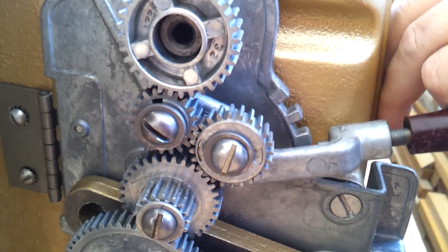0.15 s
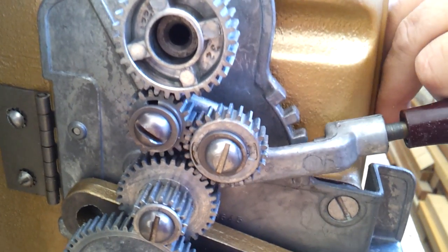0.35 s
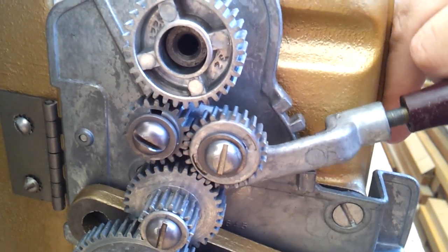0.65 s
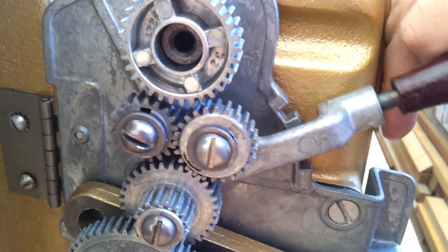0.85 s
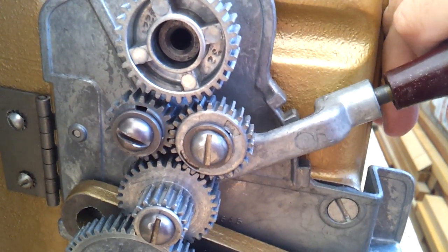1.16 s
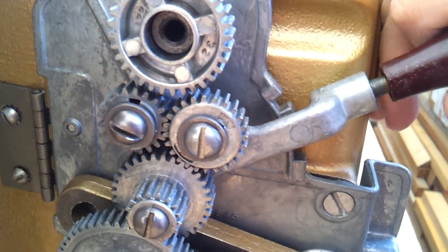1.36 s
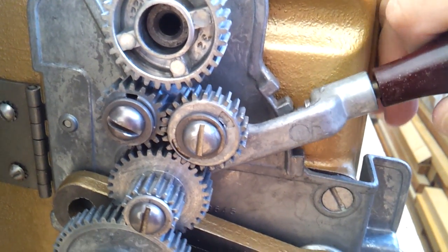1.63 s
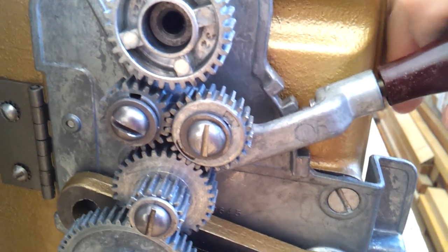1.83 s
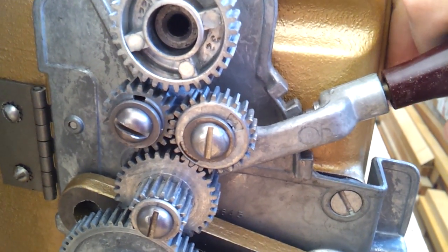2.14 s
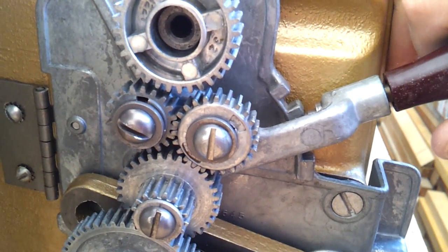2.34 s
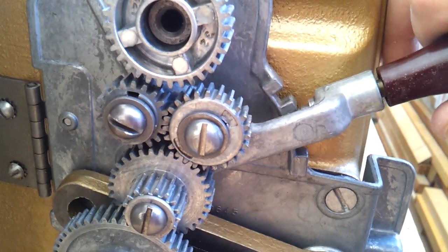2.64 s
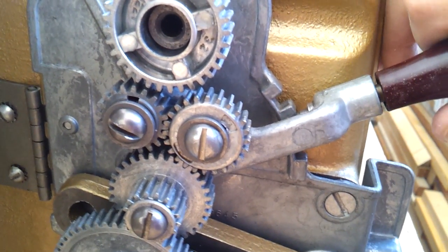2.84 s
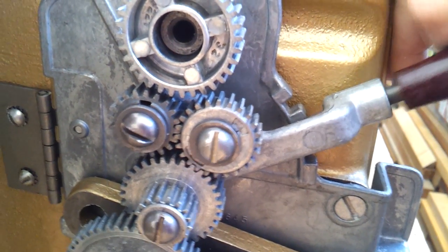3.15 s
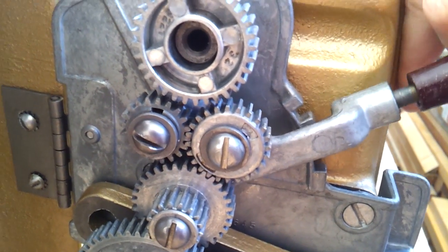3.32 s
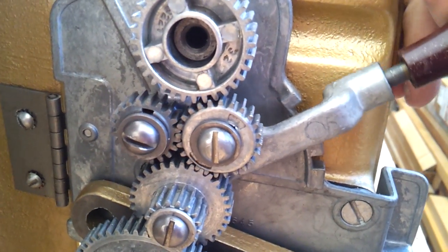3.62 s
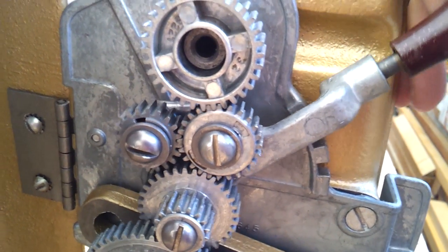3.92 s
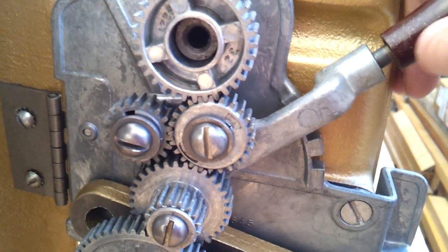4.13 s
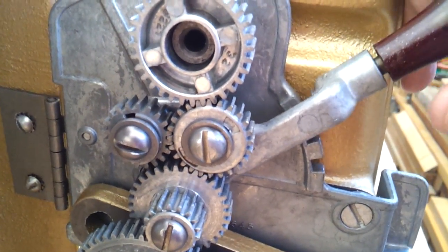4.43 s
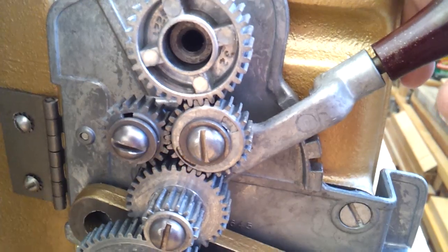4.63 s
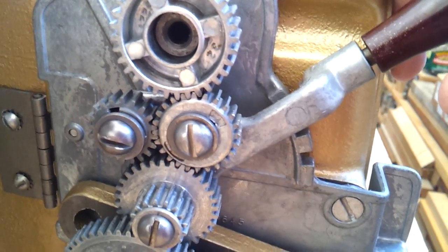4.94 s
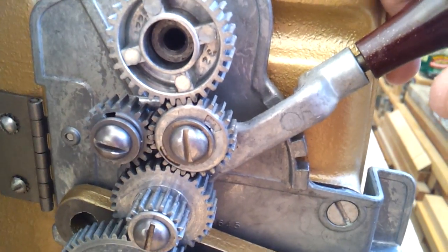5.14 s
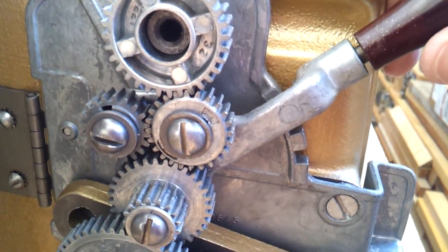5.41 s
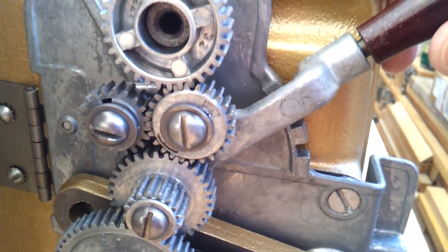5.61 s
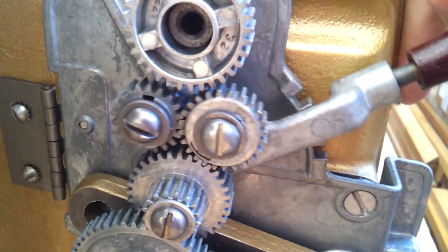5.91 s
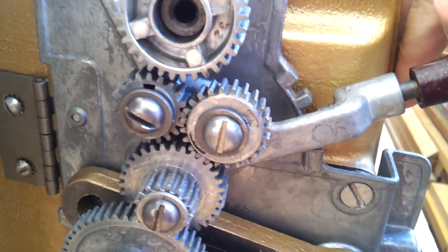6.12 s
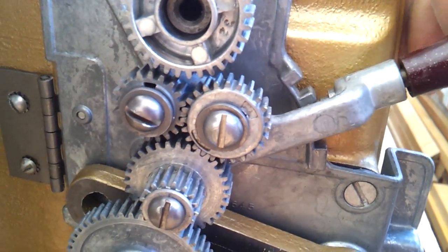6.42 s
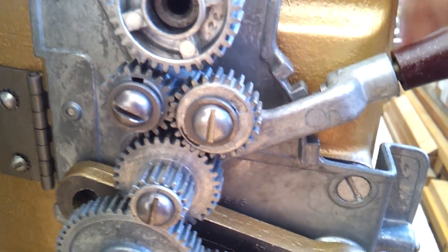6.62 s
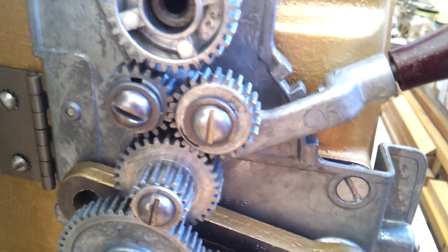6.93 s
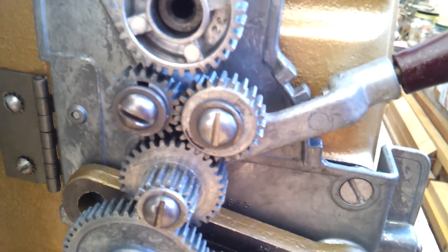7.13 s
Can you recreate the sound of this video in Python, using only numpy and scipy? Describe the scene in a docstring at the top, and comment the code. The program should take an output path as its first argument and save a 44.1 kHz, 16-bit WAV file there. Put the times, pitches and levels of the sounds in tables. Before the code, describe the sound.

Sharp metallic clacks as a geared lever is shifted by hand, hard snaps separated by quiet hiss, each ringing briefly with a soft bench thud.

```python
"""A tumbler lever on a small lathe is shifted by hand: its plunger snaps into notches and gear teeth knock.
Each blow is a brief chatter of contacts that rings frame, lever, notch plate, gears and casting.
A loosely held handle pings on, the bench thuds under soft pushes, and the quiet shop answers diffusely.
Beneath lie a smooth hiss and a faint high whine; a limiter ducks the mix after the hardest snaps."""
import sys
import numpy as np
from scipy import signal
from scipy.fft import rfft, irfft
from scipy.io import wavfile
from scipy.ndimage import uniform_filter1d, minimum_filter1d

SR = 44100
rng = np.random.default_rng(int(sys.argv[2]) if len(sys.argv) > 2 else 0)


def master(y):
    """Save y as 16-bit WAV."""
    cut = np.clip(np.atleast_2d(y).T, -1, 1)
    pcm = np.round(cut * 32767)  # scale
    wavfile.write(sys.argv[1], SR, pcm.astype(np.int16))


def ratio(d):
    """dB to gain"""
    e = np.asarray(d, float) / 20
    return 10 ** e


N = 320210  # length of the scene in samples
TAIL = 30000  # length of each ring or echo in samples


def ring(modes, scatter_db, force, detune=0.0057):
    """A struck part is a sum of decaying modes, neighbours in opposite sign, each a little off in level and pitch."""
    hz, db, t60 = np.transpose(modes)[:, :, None]
    luck = rng.standard_normal((2, len(modes), 1))
    sign = (-1) ** np.arange(len(modes))[:, None]
    t = np.arange(TAIL) / SR
    strength = sign * ratio(db + scatter_db * luck[0])
    swing = np.sin(2 * np.pi * hz * (1 + detune * luck[1]) * t)
    impulse_response = np.sum(strength * swing * 1000 ** (-t / t60), axis=0)
    y = signal.fftconvolve(impulse_response, force)[:TAIL]
    return y / np.sqrt(np.sum(y[:500] ** 2))  # unit energy in the first 500 samples


def add(track, x, s, db):
    """Lay a sound on the track from s seconds on, its peak scaled to db."""
    i = int(s * SR)
    x = x[:N - i]
    track[i:i + len(x)] += x * ratio(db) / np.max(np.abs(x))


def colour(x, points):
    """Weight the spectrum by (frequency [Hz], gain [dB]) points, joined along log frequency."""
    hz, db = np.transpose(points)
    f = np.maximum(np.arange(len(x) // 2 + 1) * SR / len(x), 1)
    return irfft(rfft(x) * ratio(np.interp(np.log(f), np.log(hz), db)), len(x))


def chatter(ms):
    """Metal on metal makes a run of tiny uneven contacts that swells and dies on a time scale of ms."""
    t = np.arange(1024) / SR / (ms / 1000)
    luck = rng.standard_normal((2, 1024))
    swell = t ** 1.25 * np.exp(-2.5 * t ** 1.1)
    contacts = luck[0] * ratio(1.5 * luck[1]) * swell
    # partly even out the spectrum, so that the modes are driven more alike
    spectrum = rfft(contacts)
    return irfft(spectrum / np.abs(spectrum) ** 0.5) * np.sqrt(swell)


def struck_parts(force, frame_db, lever_db, gears_db):
    """One force rings four parts at once; the levels are relative to the notch plate."""
    # modes of each part: (frequency [Hz], level [dB], t60 [s])
    frame_modes = [(460, -4.5, 0.026), (610, 2.5, 0.04), (676, 7.5, 0.043), (783, -2, 0.074),
                   (939, -1.5, 0.03)]
    lever_modes = [(1301, 2.2, 0.012), (1424, 1, 0.035), (1420, 5, 0.02), (1736, 7.6, 0.013)]
    plate_modes = [(1885, 1, 0.016), (2297, 4, .014), (2556, 1.5, 0.027), (2766, 3, 0.027),
                   (2990, -4, 0.036)]
    gear_modes = [(3562, 2, 0.02), (4370, -5, .015), (4407, -2, 0.02), (5220, 3, 0.018), (5337, -2, 0.023),
                  (5670, -2, 0.011), (6184, 2.5, 0.02), (6320, 9.5, 0.0026), (7120, -15, 0.028),
                  (8510, -16.5, 0.022), (11060, -13, 0.013), (12800, -11, .016)]
    plate = ring(plate_modes, 2.2, force)
    frame = ratio(frame_db) * ring(frame_modes, 3.2, force)
    lever = ratio(lever_db) * ring(lever_modes, 4.5, force)
    gears = ratio(gears_db) * ring(gear_modes, 0.8, force)
    return plate + frame + lever + gears


def casting_ring(db, frame_db, gears_db):
    """The heavy casting rings on faintly and long, its balance following how dull the blow is."""
    # modes of the casting: (frequency [Hz], level [dB], t60 [s])
    casting_modes = [(484, 5.5, .55), (896, -4, .57), (1276, -4.5, 0.62), (1320, -8.5, 0.74),
                     (2525, -8, 0.44), (2933, -8, 0.35), (2700, -13, 0.3), (2815, -4.5, 0.4),
                     (2804, -5, .62), (2900, -4.5, 0.49), (2805, -6, .55), (4310, -11.5, .35),
                     (4820, -6, .45), (5070, -10, 0.36)]
    # harder blows reach deeper into the casting: 0.1 dB more per dB of blow
    casting = ratio(-25 + 0.1 * db) * ring(casting_modes, 1.5, np.hanning(5), detune=0.0025)
    # dull blows favour its low modes
    tilt = [(500, 4.5 + 0.4 * frame_db), (1200, 0.0021), (2800, -0.25 * frame_db),
            (5000, 0.72 * gears_db + 3.5)]
    return colour(casting, tilt)


def blow(db, ms, frame_db, gears_db):
    """A blow shares its force among the parts, cracks at the contact and draws a diffuse answer."""
    # points of the answer's broad colour: (frequency [Hz])
    broad_hz = [250, 750, 1450, 2600, 3300, 7300, 9500]
    lever_db = -0.5 + 0.33 * frame_db  # the lever takes a third of the blow's dullness
    force = chatter(ms)
    body = struck_parts(force, frame_db, lever_db, gears_db)
    body = body + np.sqrt(np.sum(body ** 2)) * casting_ring(db, frame_db, gears_db)
    # the contact itself cracks across the whole treble
    crack = np.diff(force, prepend=0)
    crack_db = 1.5 * gears_db - 16
    body[:len(crack)] += ratio(crack_db) * crack / np.sqrt(np.sum(crack ** 2))
    # the diffuse answer keeps the blow's broad colour but not its single modes
    broad_db = [1.1 * frame_db + 7, 0.77 * frame_db - 3.5, lever_db, 0,
                gears_db + 0.5, gears_db - 8, gears_db - 14]
    answer = colour(shop_answer(), list(zip(broad_hz, broad_db)))
    return (body + answer)[:TAIL - 2000]


def lever_blows():
    """Plunger and gear teeth strike the metal; faint dull ticks sound as the hand takes up slack."""
    # blows of plunger and gear teeth: (time [s], peak before tone shaping [dB], chatter time scale [ms],
    # dullness = frame against notch plate [dB], gears against notch plate [dB])
    strikes = [(0.924, -34, 1.9, 11.5, -18), (1.579, -12.5, 8, -18, -9.5), (1.584, 1, 2.37, -7.5, -5),
               (3.127, -24, 9.2, 5.5, -0.5), (3.152, -33, 6, 14, -3), (3.575, -34, 2.5, 7, -12),
               (4.015, -16.5, 2.6, -10.5, -16), (4.186, -29, 10.4, 9.5, -30), (4.2002, 2, 0.64, -15.5, -9),
               (5.672, -21.5, 4, 0, -13.5), (5.688, -25.5, 1.4, -2.5, -8.5),
               (5.7097, -22.5, 9.5, 10.5, -10.5), (6.029, -4.5, 3.74, -18, -8), (6.245, -31, 4.9, 2, -17),
               (6.265, -20.5, 4.4, 2, -6), (6.274, -6, 2.4, 6.5, 0), (6.53, -45, 4.4, -3, -3.5)]
    # ticks of slack: (time [s], peak before tone shaping [dB])
    slack_ticks = [(0.704, -48), (3.909, -40.5), (3.999, -46.5), (5.021, -46.5), (6.919, -47)]
    out = np.zeros(N)
    dull_ticks = [(s, db, 3.3, 14, -12.5) for s, db in slack_ticks]
    for s, db, ms, frame_db, gears_db in strikes + dull_ticks:
        add(out, blow(db, ms, frame_db, gears_db), s, db)
    return out


def handle_pings():
    """The handle, held loosely, pings on after a short soft tap."""
    # pings of the handle: (time [s], peak before tone shaping [dB])
    ping_events = [(0.9275, -49.5), (3.1268, -39), (3.576, -45), (3.7785, -56), (4.0175, -28.5),
                   (6.0295, -36.5)]
    # modes of the handle: (frequency [Hz], level [dB], t60 [s])
    handle_modes = [(1400, 1, 0.11), (1360, -19.5, 0.31), (1550, -17, 0.12)]
    out = np.zeros(N)
    for s, db in ping_events:
        add(out, ring(handle_modes, 0.8, np.hanning(16), detune=0.0015), s, db)
    return out


def tumbler_lever():
    """Blows and pings together, shaped in tone: small parts send out little bass."""
    # tone of blows and pings, little bass, bright treble, a steep top edge at 16 kHz:
    # (frequency [Hz], gain [dB])
    lever_tone = [(100, -27.5), (300, -12.5), (410, -11.5), (480, -3.5), (9000, 6), (14500, -1),
                  (15800, -5.5), (16900, -41)]
    return colour(lever_blows() + handle_pings(), lever_tone)


def bench():
    """A soft push sets the panel going; the heavy bench follows more slowly."""
    # shakes of the bench: (time [s], peak before the microphone [dB], panel against bench [dB])
    shakes = [(0.009, -44, -12), (1.585, -33.5, 3.5), (3.139, -37, -0.5), (3.169, -46, 12),
              (3.222, -47.5, -2), (4.012, -46.5, 11), (4.2, -32.5, 5), (5.686, -40, 9), (5.718, -39.5, 3),
              (6.027, -56, 3), (6.277, -32.5, 9)]
    # modes of bench and panel: (frequency [Hz], level [dB], t60 [s])
    bench_modes = [(58.3, 9.5, 0.54), (79, -5.5, 0.17)]
    panel_modes = [(107, -4, 0.28), (143, -2, 0.39), (202, -7, 0.14), (251.5, -4, 0.48), (356, 1, 0.11)]
    out = np.zeros(N)
    for s, db, panel_db in shakes:
        heavy = ring(bench_modes, 3.0, np.hanning(420))
        panel = ratio(panel_db) * ring(panel_modes, 0.57, np.hanning(100))
        # the push starts 8 ms ahead of the listed time
        add(out, heavy + panel, max(s - 0.008, 0), db)
    return out


def shop_answer():
    """A quick rattle of loose parts, then half-octave bands of echo noise fading at their own rates."""
    # decay of the echo: (frequency [Hz], t60 [s])
    echo_decay = [(300, 0.52), (1000, 0.5), (3000, 0.78), (5000, 0.76), (6500, 0.39), (9000, 0.08)]
    # colour of rattle and echo: (frequency [Hz], gain [dB])
    echo_colour = [(300, -25.5), (1000, -28), (2000, -42.5), (3000, -41.5), (4500, -37), (7000, -38),
                   (8300, -45)]
    t = np.arange(TAIL) / SR
    hz, t60 = np.transpose(echo_decay)
    half_band = 2 ** 0.25  # ratio of centre to band edge
    rattle_fade = ratio(20.0) * 1000 ** (-t / 0.057)
    echo = 0
    for f in 200 * 2 ** np.arange(0, 6, 0.5):
        edges = [f / half_band, f * half_band]
        sos = signal.butter(2, edges, "bandpass", fs=SR, output="sos")
        band = signal.sosfilt(sos, rng.standard_normal(TAIL))
        echo_fade = 1000 ** (-t / np.interp(np.log(f), np.log(hz), t60))
        echo = echo + band * (echo_fade + rattle_fade)
    onset = 1 - np.exp(-(t / 0.002) ** 2)
    return colour(echo * onset, echo_colour)


def hiss():
    """Smooth broadband noise with one faint steady high whine."""
    # spectrum of the hiss, ending at a 16 kHz top edge: (frequency [Hz], relative density [dB per Hz])
    hiss_colour = [(15, -56), (25, -24.5), (44, -7.5), (70, 0), (108, 0), (145, -0.5), (439, -4),
                   (1100, -8), (1330, -9.5), (14800, -17), (15850, -15.5), (16100, -50)]
    # steady whine: (frequency [Hz], rms level [dB])
    whine_tones = [(15100, -85)]
    hiss_db = -59.5  # rms
    noise = colour(rng.standard_normal(N), hiss_colour)
    t = np.arange(N) / SR
    whine = sum(ratio(db) * np.sqrt(2) * np.sin(2 * np.pi * f * t) for f, db in whine_tones)
    return noise * ratio(hiss_db) / np.std(noise) + whine


def scene():
    """Lever and bench as a small microphone with weak bass hears them, over the hiss."""
    # bass response of the microphone: (frequency [Hz], gain [dB])
    mic_response = [(25, -30.5), (48, -15), (62, 0)]
    return (colour(tumbler_lever() + bench(), mic_response) + hiss())[None]


def limiter(mix):
    """Turns down just ahead of a peak, holds, and lets go at a steady rate in dB."""
    limit_db, hold_s, release_db_per_s = -3.3, 0.071, 4.5
    lookahead = 60  # samples
    over = np.maximum(20 * np.log10(np.abs(mix[0]) + 1e-9) - limit_db, 0)
    hold = int(hold_s * SR)
    # running maximum: mostly behind, with the lookahead in front
    over = -minimum_filter1d(-over, hold, origin=(hold - 1) // 2 - lookahead)
    slope = release_db_per_s * np.arange(N) / SR
    cut_db = np.maximum.accumulate(over + slope) - slope
    return mix * ratio(-uniform_filter1d(cut_db, lookahead))


def roll_off(x):
    """The treble ends steeply here."""
    return signal.sosfilt(signal.butter(12, 16650, fs=SR, output="sos"), x)


def record(dry):
    """The limiter tames the hardest snaps and finishes the mix."""
    finished_mix = limiter(dry)
    return roll_off(finished_mix)


dry = scene()
out = record(dry)
master(out)
```